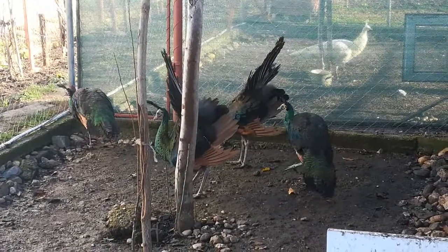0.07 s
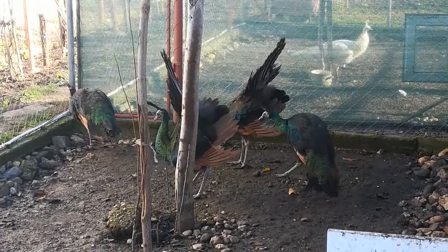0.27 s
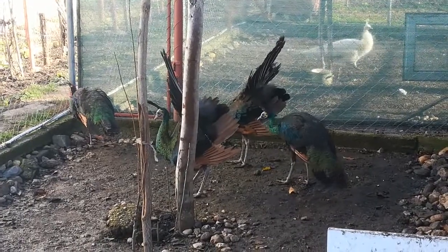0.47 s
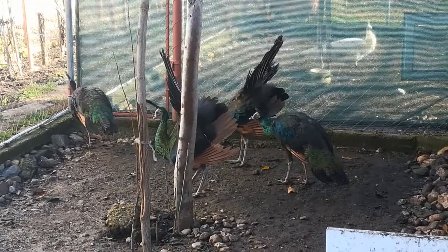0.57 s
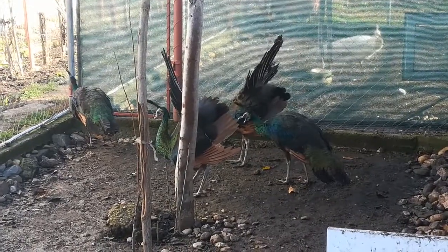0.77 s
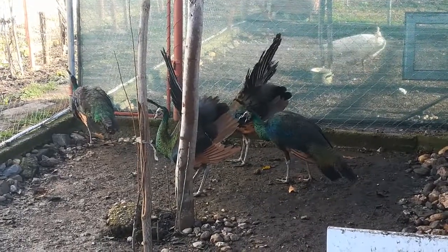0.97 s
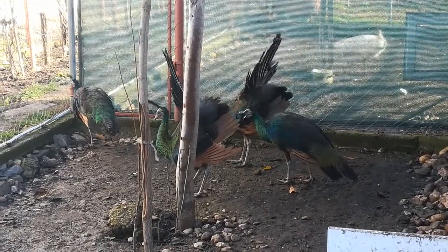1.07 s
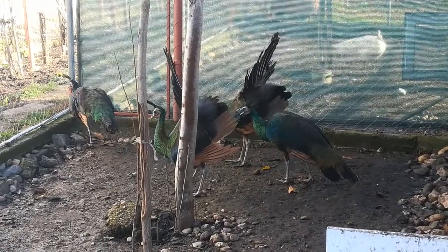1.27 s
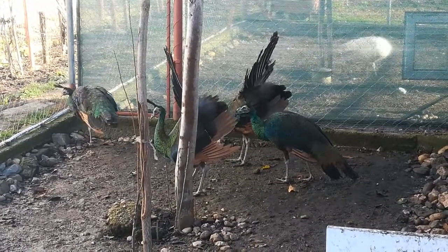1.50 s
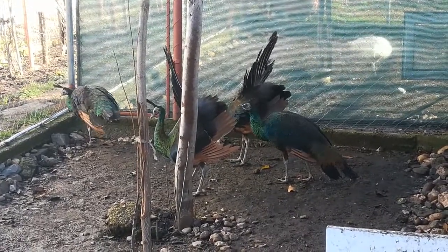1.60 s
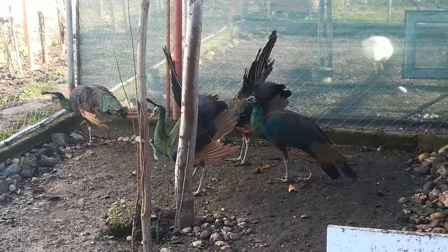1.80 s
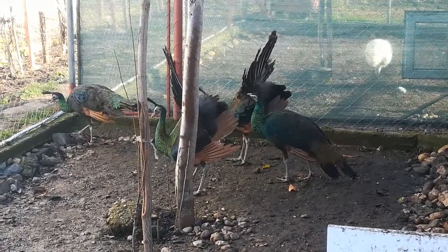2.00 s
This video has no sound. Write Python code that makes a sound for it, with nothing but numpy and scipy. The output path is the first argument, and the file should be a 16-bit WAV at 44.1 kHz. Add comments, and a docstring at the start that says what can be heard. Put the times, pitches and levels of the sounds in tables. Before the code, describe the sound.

A bird's feathers shiver with a soft hiss, as wind puffs bump the microphone.

```python
"""An outdoor pen, with a stereo microphone and a displaying peafowl off to its right.
The bird shivers its raised feathers: a fine hiss of rubbing barbs that swells twice and fades,
coloured differently at each microphone port, with a soft brush of plumage beneath it.
Early on, puffs of wind thump right on the microphone. Far across the yard, fowl call faintly
over quiet air."""
import sys
import numpy as np
from scipy import signal
from scipy.fft import rfft, irfft
from scipy.io import wavfile

SR = 44100
rng = np.random.default_rng(int(sys.argv[2]) if len(sys.argv) > 2 else 0)


def dump(signal):
    """Clip the signal to [-1, 1] and save it as 16-bit WAV at the path in sys.argv[1]."""
    limited = np.clip(np.atleast_2d(signal).T, -1, 1)
    pcm = np.round(limited * 32767).astype(np.int16)
    wavfile.write(sys.argv[1], SR, pcm)


N = 90404
TIME_S, BIN_HZ = np.arange(N) / SR, np.arange(N // 2 + 1) * SR / N


def undb(db):
    """Decibels to gain."""
    return 10 ** (np.asarray(db) / 20)


def unit(x):
    """Scale to rms 1."""
    return x / np.sqrt(np.mean(x ** 2) + 1e-30)


def curve(rows):
    """Join (time_s, value) rows by straight lines."""
    return np.interp(TIME_S, *np.array(rows).T)


def over_bins(points):
    """Read (frequency_hz, value) points at every frequency, on a log axis."""
    hz, value = np.array(points).T
    return np.interp(np.log(BIN_HZ + 1), np.log(hz), value)


def filtered(x, response):
    """Weight each frequency of x by the response."""
    return irfft(rfft(x) * response, N)


def colour(x, points):
    """Shape x by (frequency_hz, gain_db) points, then scale to rms 1."""
    return unit(filtered(x, undb(over_bins(points))))


def wander(rate_hz):
    """Smooth random drift with spread 1."""
    return unit(filtered(rng.standard_normal(N), np.exp(-(BIN_HZ / rate_hz) ** 2) * (BIN_HZ > 0)))


def barb_rubs(rubs_per_s=6200, scatter_db=2.5):
    """A dense random train of tiny clicks, one for each barb that slips."""
    sizes = undb(scatter_db * np.minimum(rng.exponential(size=N), 4))
    signs = rng.choice([-1, 1], N)
    return sizes * signs * (rng.random(N) < rubs_per_s / SR)


def rubs_at_ports(shared_below_hz=1400, left_lag_s=.0006):
    """Rubs from the right: the lows reach the left port late, the highs come by unrelated paths."""
    shared = .85 * np.exp(-(BIN_HZ / shared_below_hz) ** 2)
    delay = np.exp(-2j * np.pi * BIN_HZ * left_lag_s)
    right = barb_rubs()
    left = filtered(right, shared * delay) + filtered(barb_rubs(), np.sqrt(1 - shared ** 2))
    return np.array([left, right])


# How hard the bird shakes, before each port's gain: time_s, level_db
SHIVER_LEVEL = [(0, -96), (.33, -76), (.39, -69.5), (.5, -68), (.54, -62.5), (.62, -63.5), (.72, -63.5),
                (.78, -60), (.84, -56), (.93, -57), (1.02, -58), (1.1, -63), (1.18, -70), (1.27, -69.5),
                (1.42, -81), (1.6, -75.5), (1.72, -87), (2.05, -87)]
# Colour of the hiss at the left and at the right port: frequency_hz, gain_db
HISS_LEFT = [(150, -2), (330, -3), (520, -12), (1000, -9), (1600, -14), (1880, -5), (2150, -9.5),
             (2750, -10), (3180, -1), (3600, -5), (4250, -9), (5200, -5), (5750, 0), (6900, -9),
             (8600, -12), (10000, -22), (15000, -27)]
HISS_RIGHT = [(150, -8), (330, -8), (520, -16), (800, -15.5), (980, -9), (1600, -14), (2350, -12),
              (2650, -4), (3050, -16), (3800, -11), (4350, -1.5), (4720, -5.5), (5050, 1), (5360, -.5),
              (5650, -5), (6700, -16), (8400, -17.5), (9600, -23), (15000, -33)]


def feather_shiver(quiver_hz=24.76, quiver_depth=0.079, left_db=-5, right_db=-0.5):
    """In the pen, rubbing barbs hiss in a few narrow bands, pulsing as the quills quiver."""
    cycles = np.cumsum(quiver_hz * (1 + 0.09 * wander(6))) / SR
    quiver = 1 + quiver_depth * np.sin(2 * np.pi * cycles)
    flicker_db = -0.36 * wander(70)
    effort = undb(curve(SHIVER_LEVEL) + flicker_db) * quiver
    left, right = rubs_at_ports()
    left = colour(left, HISS_LEFT) * undb(left_db)
    right = colour(right, HISS_RIGHT) * undb(right_db)
    return effort * np.array([left, right])


# Plumage brushing as the bird shifts, heard at the microphone: time_s, level_db
BRUSH_LEVEL = [(0, -76), (.15, -83), (.17, -72.5), (.21, -76), (.28, -71.5), (.34, -72), (.4, -69),
               (.56, -69), (.72, -74), (1.0, -76), (1.25, -73.5), (1.4, -85), (1.9, -85), (2.05, -77)]
# Colour of the brushing: frequency_hz, gain_db
BRUSH_SPECTRUM = [(200, 4), (500, 5.5), (900, 4), (1600, 3), (3200, 4), (6500, 0.5), (8700, 0), (11000, -8),
                  (15500, -13)]


def plumage_brush():
    """Soft feathers slide over each other in uneven strokes: a broad, airy brush."""
    strokes = undb(curve(BRUSH_LEVEL) + 1.1 * wander(36))
    return strokes * colour(rubs_at_ports(), BRUSH_SPECTRUM)


# Puffs of wind right on the microphone: middle_s, length_s, level_db, upper_edge_hz
WIND_PUFFS = [(0.057, 0.026, -49.5, 114), (0.161, 0.021, -53, 87), (0.22, 0.023, -42.5, 163),
              (0.248, 0.028, -39.5, 215), (0.289, 0.1, -45, 113), (.316, 0.026, -50, 161),
              (0.364, 0.03, -37.5, 233), (0.379, 0.03, -33.5, 168), (0.428, 0.064, -41.5, 205),
              (0.457, 0.03, -38, 112.4), (0.495, 0.018, -40.5, 130), (0.586, 0.11, -59, 84),
              (0.679, 0.043, -51, 78), (0.744, 0.016, -59.5, 170), (0.762, 0.048, -50.5, 70),
              (0.81, 0.057, -54, 78)]
# Breeze under the puffs: time_s, level_db
BREEZE_LEVEL = [(0, -64), (.2, -55), (.5, -47.5), (.7, -64), (.85, -59), (1.05, -67.5), (1.25, -74),
                (1.5, -82.5), (1.75, -70.5), (1.95, -75), (2.0, -57), (2.05, -65)]
# Colour of its rumble: frequency_hz, gain_db
BREEZE_SPECTRUM = [(15, 2.5), (30, 3.5), (70, 5), (120, -26), (200, -40.5), (400, -45), (1000, -100)]


def wind_on_microphone(low_hz=21.2, top_hz=303, edge_order=4.45, left_lag_s=.0005, left_cutoff_hz=350):
    """Short eddies thump over a low breeze; the left port hears them a little later and duller."""
    breeze = undb(curve(BREEZE_LEVEL))
    flow = breeze * colour(rng.standard_normal(N), BREEZE_SPECTRUM)
    low_cut = BIN_HZ ** 2 / (BIN_HZ ** 2 + low_hz ** 2)
    top_cut = 1 / np.sqrt(1 + (BIN_HZ / top_hz) ** 10)
    for middle_s, length_s, level_db, upper_edge_hz in WIND_PUFFS:
        swell = np.exp(-8 * ((TIME_S - middle_s) / length_s) ** 2)
        band = low_cut / np.sqrt(1 + (BIN_HZ / upper_edge_hz) ** (2 * edge_order))
        swirl = filtered(rng.standard_normal(N), band)
        eddy = filtered(swell * swirl, top_cut)
        flow += unit(eddy) * undb(level_db) * np.sqrt(length_s * SR / N)
    delay = np.exp(-2j * np.pi * BIN_HZ * left_lag_s)
    left = filtered(flow, delay / (1 + 1j * BIN_HZ / left_cutoff_hz))
    unshared_rumble = breeze * undb(-25) * colour(rng.standard_normal((2, N)), BREEZE_SPECTRUM)
    return np.array([left, flow]) + unshared_rumble


# Fowl far across the yard:
# start_s, length_s, pitch_hz, glide_ratio, pitch_scatter_ratio, level_db, left_over_right_db
FOWL_NOTES = [(0.169, 0.059, 990, -0.02, .008, -75, -6), (0.192, 0.11, 1007, 0.035, 0.03, -78.5, 6.5),
              (1.18, .06, 1542, 0.04, 0.015, -79, 3.5), (1.639, 0.06, 1540, -0.017, 0.0087, -81.5, -12),
              (1.703, 0.13, 1700, 0.0036, 0.0068, -83.5, -11), (1.951, .11, 1210, -0.037, 0.041, -73.5, 1),
              (1.975, 0.087, 1700, -0.046, 0.049, -79, -9), (1.995, 0.059, 4480, -0.013, 0.0068, -82, 5)]


def far_fowl(echo_db=-9, yard_t60_s=0.31):
    """Thin, wavering notes from across the yard, blurred by its echo."""
    direct = np.zeros((2, N))
    for start_s, length_s, pitch_hz, glide, scatter, level_db, left_over_right_db in FOWL_NOTES:
        progress = np.clip((TIME_S - start_s) / length_s, 0, 1)
        wavering_hz = pitch_hz * (1 + glide * progress + scatter * wander(110))
        swell = np.sqrt(np.abs(np.sin(np.pi * progress)))
        note = swell * np.sin(2 * np.pi * np.cumsum(wavering_hz) / SR)
        pan = undb([[left_over_right_db / 2], [-left_over_right_db / 2]])
        direct += note * undb(level_db) * pan
    tail = rng.standard_normal((2, N)) * np.exp(-np.log(1000) * TIME_S / yard_t60_s)
    echo = signal.fftconvolve(direct, unit(tail) / np.sqrt(N), axes=1)[:, :N]
    return direct + undb(echo_db) * echo


# Colour of the open air around the pen: frequency_hz, gain_db
AIR_SPECTRUM = [(30, 9), (120, 13), (250, 5), (450, 4.5), (800, 3), (1300, 0.5), (1700, 0.5), (2400, -4),
                (5000, -3), (8000, -8.5), (11000, -12.5), (15500, -13.5)]
# How alike the two ports hear it: frequency_hz, correlation
AIR_CORRELATION = [(60, 1), (200, 0.55), (450, -0.7), (700, -0.55), (1100, -0.12), (4000, 0.029)]


def outdoor_air(level_db=-69):
    """Even outdoor background, alike at both ports in the bass."""
    correlation = np.clip(over_bins(AIR_CORRELATION), -1, 1)
    mid = filtered(rng.standard_normal(N), np.sqrt(1 + correlation))
    side = filtered(rng.standard_normal(N), np.sqrt(1 - correlation))
    air = colour(np.array([mid + side, mid - side]), AIR_SPECTRUM)
    return air * undb(level_db + 0.27 * wander(24))


def scene():
    """The bird, the wind and the yard as they meet at the microphone."""
    return feather_shiver() + plumage_brush() + wind_on_microphone() + far_fowl() + outdoor_air()


def record(dry):
    """The recorder cuts the top steeply."""
    top_hz = 15650
    return signal.sosfilt(signal.ellip(10, .2, 70, top_hz, fs=SR, output="sos"), dry)


dry = scene()
out = record(dry)
dump(out)
```